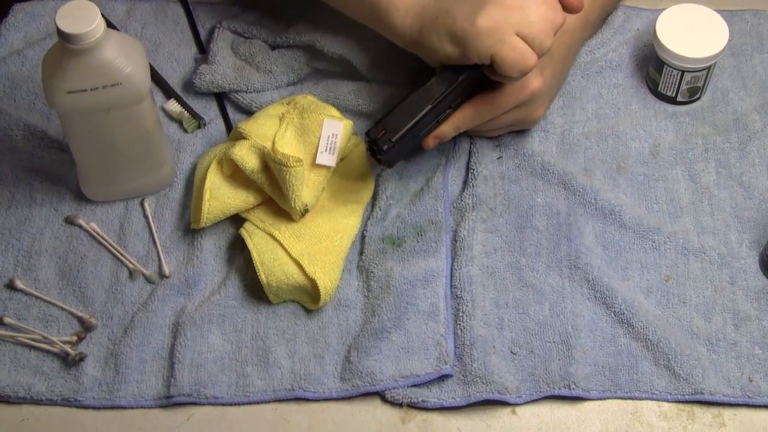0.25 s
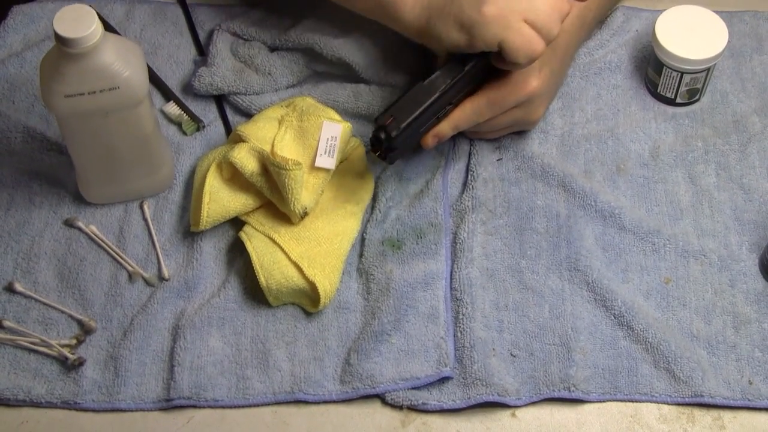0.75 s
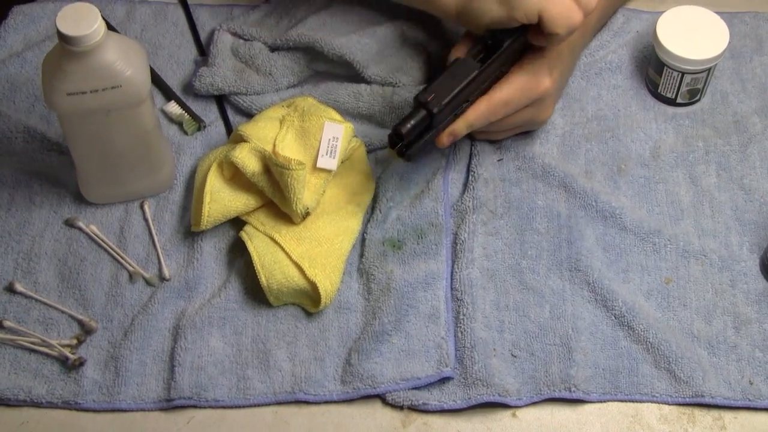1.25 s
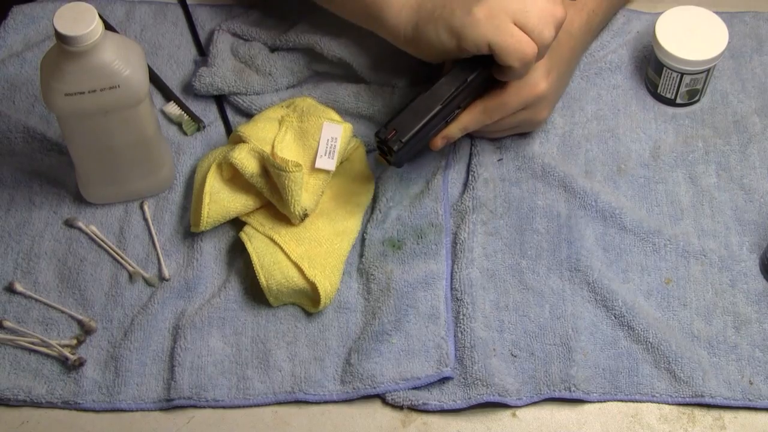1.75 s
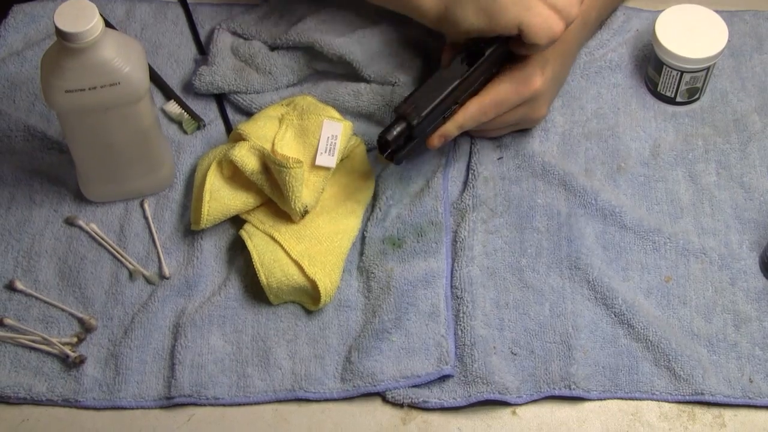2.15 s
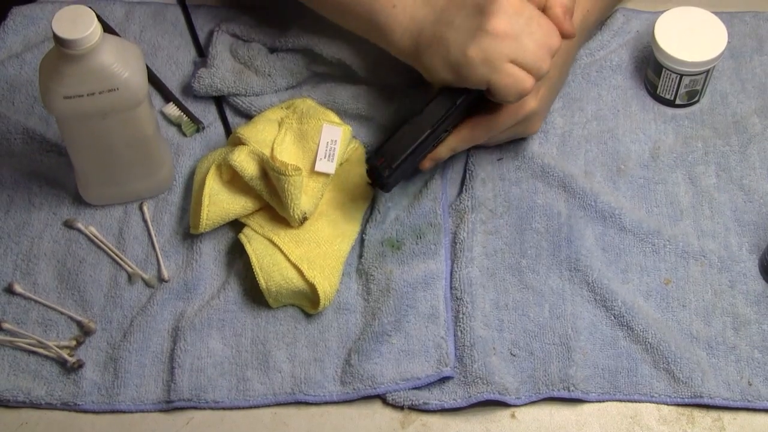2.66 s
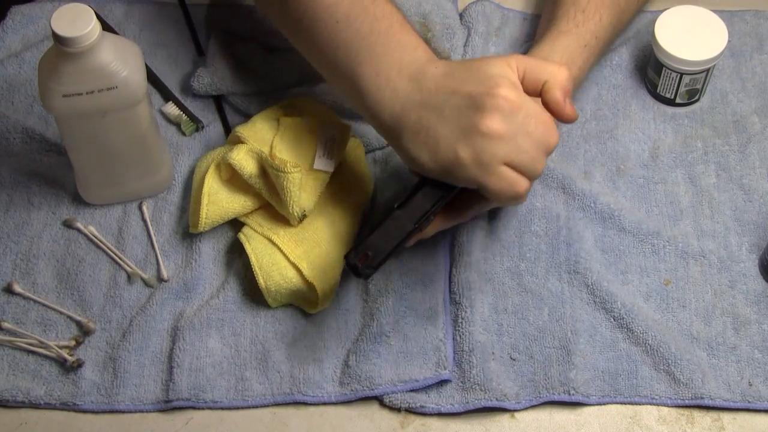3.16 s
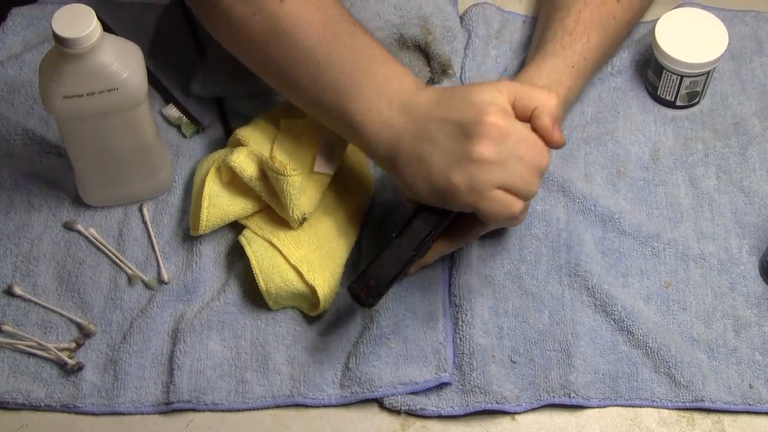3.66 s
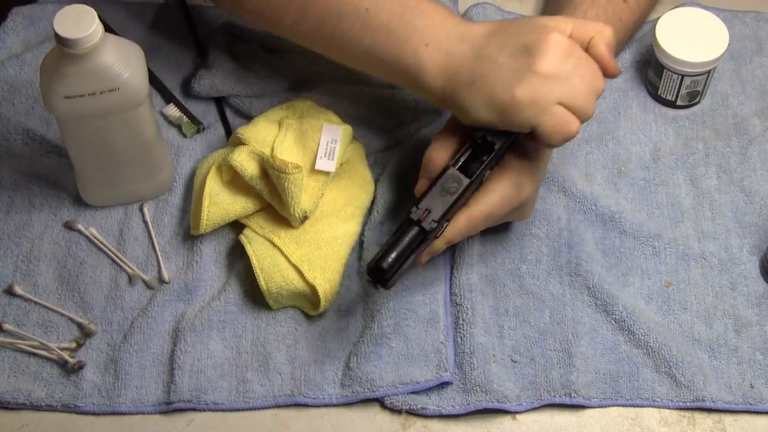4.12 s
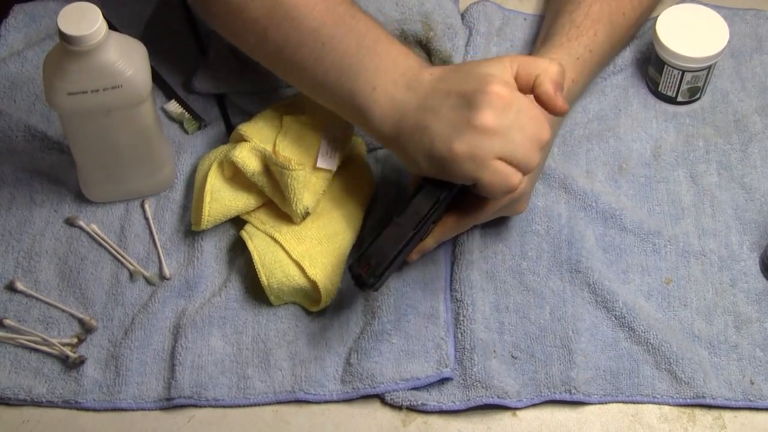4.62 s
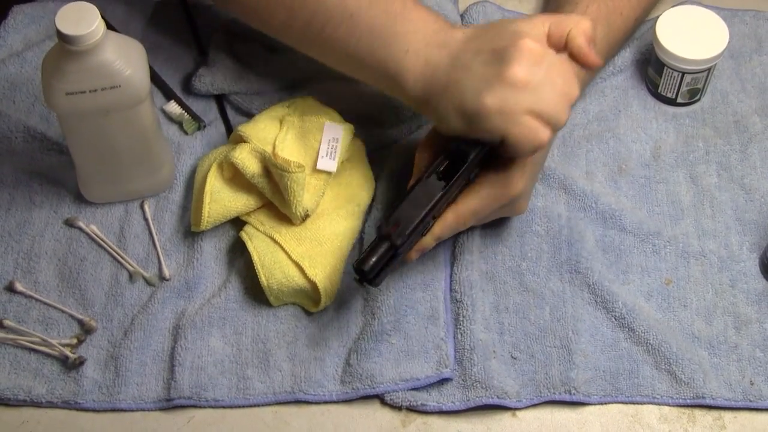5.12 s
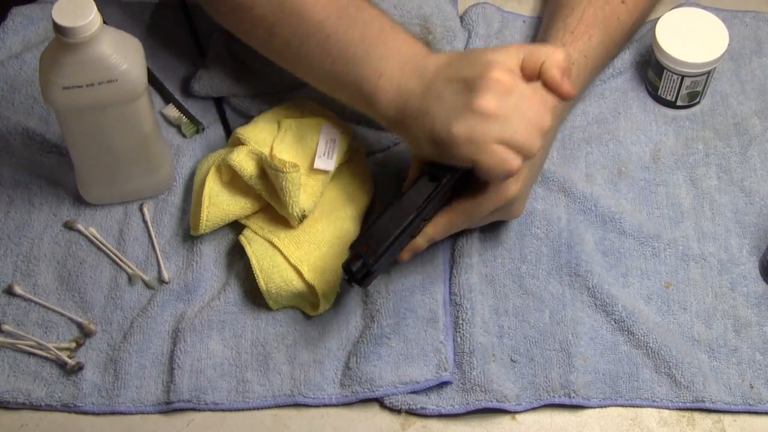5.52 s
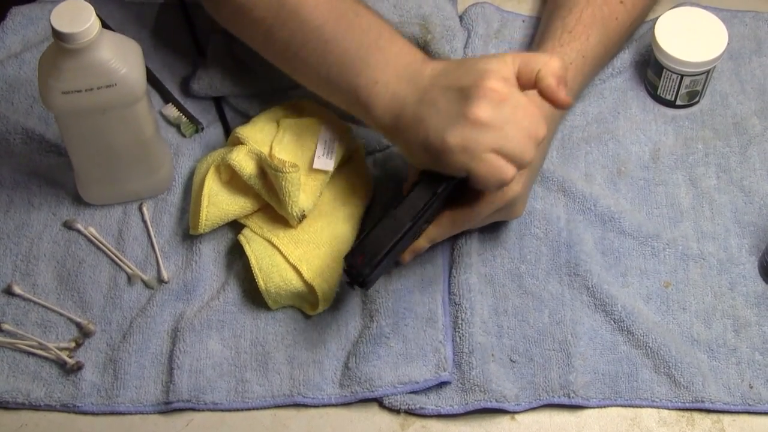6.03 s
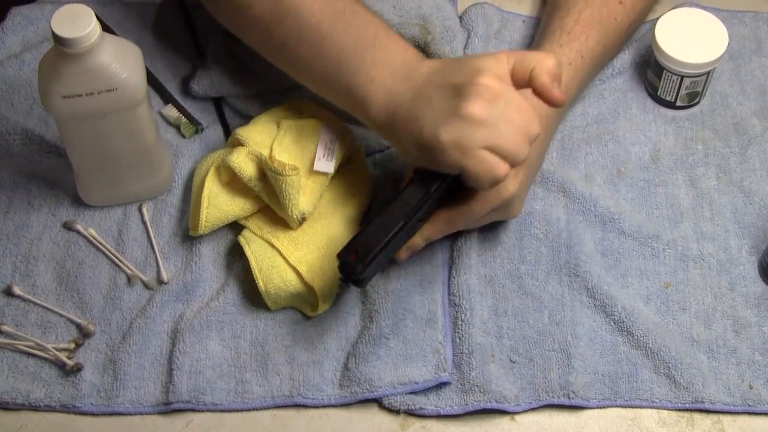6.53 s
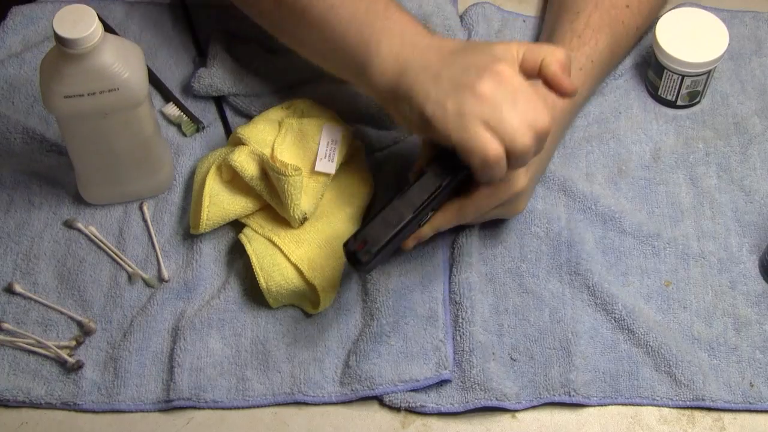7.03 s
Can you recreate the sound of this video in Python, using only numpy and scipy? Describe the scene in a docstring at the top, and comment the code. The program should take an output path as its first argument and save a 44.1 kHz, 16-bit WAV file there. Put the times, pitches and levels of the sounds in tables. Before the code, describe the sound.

A handgun slide is worked by hand over a towel-covered table, recorded closely in stereo with a short room reverberation. Sharp dry metal clacks come in pairs, joined by rasping friction, very high short squeals, small rattles and muted woody knocks. Strokes come in groups with two short gaps, then a faster, regular sequence. Soft room air sinks under the loud clacks and slowly returns afterward.

```python
"""Steel pistol slide racked by hand

A steel pistol slide is racked back and forth over a table in a small room, close to a recorder.
Noise cracks and struck steel modes make the clacks, low table modes the thuds, gritty noise the scrape.
Sticking and slipping steel squeals near 10 kHz as a gliding sine pair; shaped noise is the room tone.
The recorder's gain control ducks the whole sound, room tone included, while the slide is loud.
"""
import sys
import numpy as np
from scipy import signal
from scipy.fft import rfft, irfft, next_fast_len
from scipy.io import wavfile
from scipy.ndimage import uniform_filter1d

SR = 44100
rng = np.random.default_rng(int(sys.argv[2]) if len(sys.argv) > 2 else 0)


def materialize(psi):
    """Save the field psi as 16-bit PCM at rate SR to the path in sys.argv[1].

    A 1-D psi becomes a single channel; in a 2-D psi each row is a channel.
    """
    bounded = np.clip(np.atleast_2d(psi).T, -1, 1)
    quanta = np.round(bounded * 32767).astype(np.int16)
    wavfile.write(sys.argv[1], SR, quanta)


N = 320985  # samples

# modes of slide and barrel: f/Hz, width/Hz, relative level/dB
STEEL_MODES = [(2020, 560, -10), (4217, 635, -3.5), (4340, 37, 2), (7250, 710, 1.5), (8470, 630, 4.5),
               (9120, 250, -6.5), (10410, 150, -9), (10200, 770, -12)]
# one row a stroke: pull t/s, rear stop t/s, shut t/s
STROKES = [(.052, .151, .285), (.443, .522, .655), (.826, .953, 1.018), (1.179, 1.24, 1.37),
           (2.045, 2.2, 2.26), (2.408, 2.487, 2.59), (2.737, 2.815, 2.93), (3.414, 3.563, 3.63),
           (3.773, 3.84, 3.983), (4.125, 4.185, 4.325), (4.468, 4.517, 4.652), (4.77, 4.847, 4.962),
           (5.059, 5.128, 5.244), (5.328, 5.44, 5.505), (5.591, 5.663, 5.76), (5.854, 5.97, 6.015),
           (6.106, 6.21, 6.258), (6.354, 6.46, 6.507), (6.61, 6.722, 6.76), (6.861, 6.935, 7.0)]
# force of the same strokes: rub level/dB, thud of the pull/dB, thud of the rear stop/dB
EFFORTS_DB = [(-37, -42, -32.5), (-30, -31, -31), (-32, -25.5, -48), (-29, -29, -31.5), (-37, -29, -41),
              (-31, -30.5, -30.5), (-28.5, -29.5, -29.5), (-39.5, -33, -39), (-33.5, -30, -33.5),
              (-37, -36, -34), (-33, -32.5, -29), (-32.5, -38, -33), (-31, -45, -36), (-33.5, -39, -48),
              (-32.5, -42, -45), (-33.5, -34.5, -39), (-31.5, -38, -37.5), (-35.5, -33, -40),
              (-36.5, -35.5, -45), (-34.5, -40, -56)]


def gain_of(db):
    """Amplitude factor of a level in dB."""
    return 10 ** (np.asarray(db) / 20)


def evened(x):
    """Scales a signal to rms 1."""
    return x / np.sqrt(np.mean(x ** 2) + 1e-20)


def steady(x):
    """Noise with its millisecond level evened out."""
    return x / np.sqrt(abs(uniform_filter1d(x ** 2, size=48)) + 1e-20)


def read(points, hz):
    """Reads a curve of (f/Hz, value) along log frequency."""
    f, value = np.transpose(points)
    return np.interp(np.log(hz + 1), np.log(f + 1), value)


def add(mix, s, sound):
    """Adds a sound to the mix from s seconds on."""
    part = mix[round(s * SR):][:len(sound)]
    part += sound[:len(part)]


def coloured(x, points):
    """Weights a signal by a spectrum in dB."""
    count = x.shape[-1]
    size = next_fast_len(count)
    weights = gain_of(read(points, np.fft.rfftfreq(size, 1 / SR)))
    return irfft(rfft(x, size) * weights, size)[..., :count]


def wander(count, rate_hz):
    """Smooth random drift of rms 1, from noise averaged twice."""
    size = max(int(SR / rate_hz), 1)
    once = uniform_filter1d(rng.standard_normal(count), size)
    return evened(uniform_filter1d(once, size))


def ramps(rows, fade):
    """Gain of dB ramps (start, end, first dB, last dB), each falling 49.5 dB in fade s; the loudest wins."""
    gain, t = np.zeros(N), np.arange(N) / SR
    for start, end, first_db, last_db in rows:
        part = slice(round(start * SR), round((end + fade) * SR))
        db = np.interp(t[part], [start, end, end + fade], [first_db, last_db, last_db - 49.5])
        gain[part] = np.maximum(gain[part], gain_of(db))
    return uniform_filter1d(gain, size=40)  # soften the edges


def resonate(x, hz, width):
    """A one-pole complex resonance with a peak gain near 1; a wider one dies sooner."""
    r = np.exp(-np.pi * width / SR)
    return 2 * signal.lfilter([1 - r], [1, -r * np.exp(2j * np.pi * hz / SR)], x).real


def steel(x):
    """The gripped slide rings briefly at its modes."""
    return sum(gain_of(db) * resonate(x, hz, width) for hz, width, db in STEEL_MODES)


def room_tone():
    """Soft air noise, partly opposite in the two channels."""
    # air noise spectrum: f/Hz, relative level per Hz/dB
    air_curve = [(20, 1), (45, -26), (113, -12), (177, -1.5), (400, -2), (700, -6), (2000, -13.5),
                 (6000, -27.5), (10000, -30.5), (16000, -53)]
    # left-right likeness, negative where opposite: f/Hz, correlation
    likeness = [(60, 0.97), (240, -0.24), (950, -0.34), (3770, -0.027), (15000, 1)]
    frames, hz = N // 256 + 5, np.fft.rfftfreq(1024, 1 / SR)
    a, b, c, d = rng.standard_normal((frames, 513, 4)).T
    same = np.clip(read(likeness, hz), -1, 1)[:, None]
    left = a + 1j * b
    right = same * left + np.sqrt(1 - same ** 2) * (c + 1j * d)
    z = np.array([left, right]) * gain_of(read(air_curve, hz)[:, None])
    air = signal.istft(z, nperseg=1024, noverlap=768)[1][:, :N]
    return gain_of(-54) * evened(air)


def room(x):
    """Three diffuse tails take turns at a steady rate, so no fixed comb colours the sound."""
    # reverberation: f/Hz, t60/s
    decay_times = [(200, .25), (700, .25), (2000, .26), (5000, .26), (10000, .23), (12000, .2),
                   (15000, .15)]
    hz, t, z = signal.stft(rng.standard_normal((3, 2, SR // 2)), SR, nperseg=256)
    t60 = read(decay_times, hz)[:, None]  # each band dies at its own speed
    early = gain_of(-60 * t / t60)
    late = gain_of(-10 - 60 * t / (1.87 * t60))  # fainter and longer
    tails = signal.istft(z * (early + late), SR, nperseg=256)[1]
    tails[..., :150] = 0  # the first reflection needs a few milliseconds
    # the stereo tails cycle at 4.7 Hz
    turn = 2 * np.pi * (4.7 * np.arange(N) / SR + np.arange(3)[:, None, None] / 3)
    wet = signal.fftconvolve(x * np.cos(turn), tails / np.linalg.norm(tails[0, 0]), axes=2)
    return wet.sum(0)[:, :N]


def thuds():
    """Pull, stop and shut shake the table's low modes; each thud's mode shares and tuning vary at random."""
    # table modes: f/Hz, relative level/dB, t60/s
    table_modes = [(124, -2, 0.16), (163.9, 5, 0.11), (282, -6, .05), (328, -6, 0.075), (465.4, 4.5, 0.13),
                   (592, 4.5, 0.061), (744, -10, 0.014)]
    # the hand takes a new hold: t/s, thud peak/dB
    new_hold = (3.332, -37.5)
    shut_thud_db = -42
    out, t = np.zeros(N), np.arange(9000) / SR
    hz, db, t60 = np.transpose(table_modes)[:, :, None]
    blows = [new_hold]
    for (pull, stop, shut), (_, pull_db, stop_db) in zip(STROKES, EFFORTS_DB):
        blows += [(pull, pull_db), (stop, stop_db), (shut, shut_thud_db)]
    # spread of each mode: 2.5 dB in share, 4 % in tuning
    luck = rng.standard_normal((len(blows), 2, len(table_modes), 1)) * [[[2.5]], [[.04]]]
    for (s, peak_db), (share_db, tune) in zip(blows, luck):
        decay = gain_of(db + share_db - 60 * t / t60)
        modes = decay * np.sin(2 * np.pi * hz * (1 + tune) * t)
        thud = modes.sum(0) * np.minimum(t / 0.0089, 1)  # soft onset, in s
        add(out, s, gain_of(peak_db) * thud / abs(thud).max())
    return out


def scrape():
    """Dense grit of uneven size, with sparse ticks as burrs catch, sets the steel ringing."""
    # colour of the rub: f/Hz, relative level per Hz/dB
    rub_curve = [(47, -47.5), (80, -10), (518, -7), (772, -12), (1150, -1.5), (1380, -9), (4280, -3.5),
                 (8150, -15), (9960, -11.5), (14200, -28.5), (16200, -65.5)]
    # the slide drags before it comes free: start t/s, end t/s, first level/dB, last level/dB
    drag_rows = [(2.013, 2.045, -54.5, -45.5), (3.38, 3.414, -53, -42.5), (3.745, 3.773, -52, -45),
                 (4.105, 4.125, -50, -52)]
    rub_sag_db, rub_fade_s, drag_fade_s = -9, 0.2, 0.026  # the rub weakens along the stroke
    grit = rng.standard_normal(N) * gain_of(3 * wander(N, 400) + 3 * wander(N, 60))
    catches = rng.random(N) < 90 / SR  # about 90 a second
    burrs = catches * gain_of(4 * np.minimum(rng.exponential(1, N), 3))
    tick_decay = np.exp(-1 / (0.00036 * SR))  # time constant in s
    burr_ticks = rng.standard_normal(N) * signal.lfilter([1], [1, -tick_decay], burrs)
    rasp = evened(coloured(evened(grit) + gain_of(-6) * evened(burr_ticks), rub_curve))
    rub_rows = [(pull, shut, db, db + rub_sag_db)
                for (pull, _, shut), (db, *_) in zip(STROKES, EFFORTS_DB)]
    rub = rasp * ramps(rub_rows, rub_fade_s)
    drag = rasp * ramps(drag_rows, drag_fade_s)
    lowest_hz, width, _ = STEEL_MODES[0]
    ringing = gain_of(-17) * steel(rub)
    groan = gain_of(16) * resonate(drag, lowest_hz, width)
    return rub + drag + ringing + groan


def squeals():
    """Stick-slip keeps one slide mode singing, flatter under a hard press; a weak neighbour makes it throb."""
    # bursts of squeal: t/s, length/s, first level/dB, change by the end/dB
    bursts = [(0.063, 0.024, -17.5, -14.5), (0.143, .04, -19, -1), (0.219, 0.011, -16, -8.5),
              (0.283, .012, -7, -2), (0.447, 0.031, -11.5, -15.5), (0.482, 0.045, -29, -4.5),
              (0.532, 0.038, -10, -25.5), (0.567, 0.014, -18, -5), (.828, .011, -8.5, -4),
              (0.948, .015, -10, -9), (1.021, .008, -10, -24), (1.187, 0.0277, -10.5, -8.5),
              (1.244, .016, -15.5, -16), (1.285, .016, -16, -8.5), (1.368, 0.012, -21.5, -9.5),
              (2.021, 0.016, -31, 0), (2.046, 0.017, -21.5, 1.5), (2.063, 0.036, -14.5, -16),
              (2.411, .03, -23.5, 1), (2.493, .036, -17.5, -2), (2.589, .012, -4.5, -23),
              (2.759, .021, -11.5, -4.5), (2.819, 0.015, -15, -4), (3.429, .041, -8, -26.5),
              (3.559, .008, -14, -16.5), (3.624, 0.0066, -15.5, 5.5), (3.784, .029, -12, -9.5),
              (3.845, 0.0097, -10.5, -7.5), (3.907, .009, -12, -5.5), (3.976, 0.0048, -21, -9.5),
              (4.137, 0.015, -11, -12.5), (4.234, 0.0086, -17, -4), (4.327, 0.0057, -21, -16.5),
              (4.472, .031, -10.5, 1.5), (4.572, 0.0058, -10.5, -10), (4.774, .03, -9.5, 6.5),
              (4.812, 0.027, -12.5, -8.5), (4.846, 0.025, -21.5, 1.5), (4.902, 0.012, -9, -4.5),
              (5.063, .01, -7, -23), (5.071, .025, -22.5, 14), (5.139, 0.018, -16, -13),
              (5.178, 0.015, -13, 1), (5.334, .03, -9, 0.5), (5.44, 0.023, -20, 2),
              (5.605, 0.018, -11, -9.5), (5.656, 0.027, -19.5, -9), (5.71, 0.007, -15, 8.5),
              (5.765, 0.0047, -16, -9), (5.86, 0.018, -12, -14), (5.962, 0.012, -13.5, -3),
              (6.117, 0.011, -6.5, -12), (6.123, 0.0205, -8.5, 5), (6.155, .018, -14.5, -8),
              (6.361, 0.013, -16, -0.5), (6.371, .025, -12, -3), (6.462, 0.0094, -13.5, -5),
              (6.619, 0.029, -9.5, -7.5), (6.72, 0.015, -7.5, -7), (6.869, 0.017, -10, -7.5),
              (6.884, 0.021, -5, -3), (6.911, 0.034, -12, -5), (6.955, 0.0054, -21, -4)]
    fade_s = 0.0089
    rows = [(s, s + length, db, db + swell_db) for s, length, db, swell_db in bursts]
    level = ramps(rows, fade_s)
    press = np.clip(uniform_filter1d(level, size=300) / 0.15, 0, 1)  # a louder squeal counts as harder
    pitch_hz = 10040 - 130 * press + 30 * wander(N, 203.8)
    turns = np.cumsum(pitch_hz) / SR
    neighbour = gain_of(-11.5) * np.sin(2 * np.pi * 1.05 * turns)
    tone = np.sin(2 * np.pi * turns) + neighbour
    return level * gain_of(2.7 * wander(N, 700)) * tone


def ticks():
    """Faint dull contacts at chance moments of every stroke, as rows like the clacks."""
    per_stroke, level_db, treble_db, spread_db = 2, -32.5, -7.5, 5
    pull, shut = np.transpose(STROKES)[[0, 2], :, None]
    when = rng.random((len(STROKES), per_stroke))
    luck = spread_db * rng.standard_normal((len(STROKES), per_stroke, 2))
    rows = [pull + when * (shut - pull), level_db + luck[..., 0], treble_db + luck[..., 1]]
    return [tuple(row) for row in np.reshape(rows, (3, -1)).T]


def rattle_of(s):
    """Starting level of a clack's rattle in dB: weakest at the rear stop, stronger shutting, else strongest."""
    near_s = .012  # a clack this close to a stop belongs to it
    stop, shut = np.transpose(STROKES)[1:3]
    if abs(s - stop).min() < near_s:
        return -19.5
    if abs(s - shut).min() < near_s:
        return -11.5
    return -8.5


def clacks():
    """Each contact is a millisecond crack with a gritty lead-in and rattle; its blow rings the steel."""
    # clear clacks: peak t/s, relative level/dB, treble trim/dB
    clear_clacks = [(.056, -32.5, -18), (.0627, -20.5, -3), (.1537, -9, -8), (.193, -23, -6.5),
                    (.2188, -21.5, -6), (.2248, -25.5, -8.5), (.2291, -19, -23), (.2776, -15.5, -10),
                    (.284, -9, 1), (.4435, -18.5, -14), (.4485, -12.5, -6), (.5267, -3.5, -3.5),
                    (.5717, -33, -33.5), (.5856, -22.5, -20.5), (.5966, -21.5, -22.5), (.656, -7.5, 1.5),
                    (.8258, -16, -19.5), (.8307, -17.5, 0.5), (.907, -26.5, -17.5), (.9574, -11.5, -11.5),
                    (.9732, -17.5, -26.5), (1.0183, -7.5, -0.5), (1.1802, -24.5, -22.5), (1.1868, -19.5, 4),
                    (1.2463, -2, -0.5), (1.2956, -28, -19.5), (1.3115, -34, -14.5), (1.3695, -17, 7),
                    (1.3734, -14, -5.5), (2.017, -35, -12), (2.046, -26, -19), (2.0514, -16.5, -1.5),
                    (2.0662, -24.5, -12.5), (2.1128, -39, -14.5), (2.1906, -27.5, -23),
                    (2.2059, -14.5, -36.5), (2.2556, -19, 3.5), (2.2605, -13, 2.5), (2.4137, -19, -2),
                    (2.4893, -8, -5), (2.506, -20, -26), (2.5218, -17.5, -22), (2.5306, -17.5, -8),
                    (2.5904, -11, 1.5), (2.5945, -14.5, -7), (2.7396, -26, -29), (2.7456, -14, -2.5),
                    (2.8182, -6.5, -35.5), (2.8636, -28, -24.5), (2.8727, -18, -42.5), (2.9333, -10, 1),
                    (3.339, -49.5, -5), (3.3858, -46.5, -18), (3.4184, -16, -6.5), (3.4243, -14, -1),
                    (3.545, -44.5, -18), (3.5601, -15, -41), (3.569, -11.5, -32), (3.6223, -21, -19),
                    (3.6285, -10.5, -3.5), (3.633, -14.5, 3.5), (3.7754, -15, -38), (3.7817, -12.5, -4),
                    (3.8456, -3, -4.5), (3.9065, -25, -14), (3.919, -19.5, -32), (3.983, -15.5, 5.5),
                    (3.9874, -13, -26), (4.126, -18, -7), (4.1352, -11, -4.5), (4.1901, -4.5, -1.5),
                    (4.255, -27.5, -21), (4.3243, -16.5, 3.5), (4.3296, -12.5, 1), (4.467, -33.5, -13),
                    (4.4728, -12, -0.5), (4.5217, -5, -1.5), (4.571, -24, -10.5), (4.579, -22, -17),
                    (4.644, -25, -21), (4.6525, -18.5, 7.5), (4.656, -11.5, -15), (4.7739, -14, -27),
                    (4.7782, -18.5, -21), (4.8104, -21, -27), (4.8506, -10.5, -11.5), (4.866, -18.5, 0),
                    (4.8854, -18.5, -23), (4.8929, -15.5, -11), (4.8982, -17, -32), (4.9632, -12, 5),
                    (4.966, -12, -10.5), (5.062, -18.5, -24.5), (5.0672, -16, -4.5), (5.1297, -5.5, -42),
                    (5.179, -19, -18), (5.1874, -17.5, -10), (5.2399, -21, -22.5), (5.245, -8, 0.5),
                    (5.3325, -17, -1), (5.3373, -18, -27.5), (5.4446, -17, -33), (5.4586, -17.5, -14),
                    (5.5006, -23, -4), (5.507, -7.5, 0.5), (5.599, -24, 0), (5.6033, -16, -25),
                    (5.6676, -10.5, -8), (5.6815, -40, 8), (5.7116, -20, -28), (5.7208, -21.5, 0),
                    (5.7594, -6.5, 2), (5.8512, -18.5, -11), (5.8636, -12, -2.5), (5.9674, -18.5, -32),
                    (5.9784, -14, -14), (6.0151, -11.5, 3.5), (6.106, -25, -17), (6.1164, -15.5, -16),
                    (6.1972, -29, -32), (6.2142, -14, -30), (6.2254, -16.5, -35), (6.2565, -14, 2),
                    (6.261, -4.5, -0.5), (6.355, -19, -14), (6.3638, -13.5, -1), (6.3781, -20, -4),
                    (6.4651, -16.5, -35), (6.4736, -15, -30), (6.5074, -10.5, 1), (6.6068, -28, -6),
                    (6.6185, -16, -7), (6.721, -18, -24), (6.7256, -15, -33), (6.7319, -15, -22),
                    (6.7624, -9, 0.5), (6.8609, -23, -5), (6.871, -18, -2), (6.8884, -20, -27),
                    (6.9382, -13.5, -17), (6.9994, -8, 2)]
    # colour of a crack: f/Hz, relative level per Hz/dB
    crack_curve = [(180, -49), (300, -21), (680, -18), (1220, -7.5), (2960, -2), (3800, -4), (8900, -9.5),
                   (10000, 6), (11200, -3.5), (14000, -11), (16200, -31)]
    lead_in_db, knock_db = -16.5, 8  # grit before the crack; impulse that strikes the steel
    out, knocks = np.zeros(N), np.zeros(N)
    t = np.arange(2500) / SR - .012  # the peak is at 0
    late, early = np.maximum(t, 0), np.maximum(-t, 0)
    contacts = clear_clacks + ticks()
    luck = rng.standard_normal((len(contacts), 2, 2500))
    split = signal.butter(3, 8600, "low", fs=SR, output="sos")
    for (s, level_db, treble_db), (noise, chatter) in zip(contacts, luck):
        uneven_db = 5 * np.clip(evened(uniform_filter1d(chatter, size=40)), -3, 2)
        rattle_db = np.where(t > 0, rattle_of(s), lead_in_db) + uneven_db
        rattle_db = rattle_db - 60 * late / 0.066 - 60 * early / 0.015  # 60 dB in so many s
        crack_db = -60 * late / 0.0046 - 60 * early / 0.0044
        burst = gain_of(crack_db) + gain_of(rattle_db)
        crack = evened(coloured(noise, crack_curve))
        middle = signal.sosfilt(split, crack)
        bright = steady(middle) + gain_of(treble_db + 4) * steady(crack - middle)
        add(out, s + t[0], gain_of(level_db) * burst * bright)
        add(knocks, s, gain_of([level_db + knock_db]))
    return gain_of(-7) * out + gain_of(3) * steel(out + knocks)


def scene():
    """The slide sits near the centre; a slightly late copy and the room make the side signal."""
    # colour of the side signal: f/Hz, weight/dB
    side_curve = [(60, -10.5), (130, -29), (290, -14.5), (640, -17), (1410, -27.5), (3100, -17.5),
                  (6820, -14), (15000, -7)]
    # channel balance: f/Hz, left over right/dB
    balance = [(60, -1), (300, 0), (3000, 0), (8000, -0.5), (9900, -2.5), (11200, 2.5), (15000, 0)]
    slide = clacks() + thuds() + squeals() + scrape()
    # small things radiate no deep bass
    slide = signal.sosfilt(signal.butter(2, 95, "high", fs=SR, output="sos"), slide)
    front, across = room(slide)
    mid = slide + gain_of(-12.5) * front
    late_copy = np.roll(slide, shift=9)  # 0.2 ms
    side = coloured(gain_of(-5) * late_copy + gain_of(-1) * across, side_curve)
    half = np.array(balance) * [1, .5]  # half the balance up on the left, half down on the right
    left, right = coloured(mid + side, half), coloured(mid - side, half * [1, -1])
    return np.array([left, right]) + room_tone()


def record(dry):
    """Bass cut; gain control falls quickly and recovers slowly; peaks clip; then the band limit."""
    threshold_db, recovery_db_per_s, depth, edge_hz = -29, 15.1, 0.55, 16300  # depth: dB cut per dB over
    dry = signal.sosfilt(signal.butter(1, 30, "high", fs=SR, output="sos"), dry)
    power_db = 10 * np.log10(abs(uniform_filter1d((dry ** 2).mean(0), 800)) + 1e-12)
    fall = np.arange(N) * recovery_db_per_s / SR
    held_db = np.maximum.accumulate(power_db + fall) - fall  # rises with the level, sinks at the set speed
    over_db = np.maximum(held_db - threshold_db, 0)
    cut = gain_of(depth * uniform_filter1d(over_db, 400))
    ducked = np.clip(gain_of(6) * dry / cut, -1, 1)
    band_limit = signal.firwin(511, edge_hz, window=("kaiser", 9), fs=SR)
    return signal.oaconvolve(ducked, band_limit[None], "same")


dry = scene()
out = record(dry)
materialize(out)
```